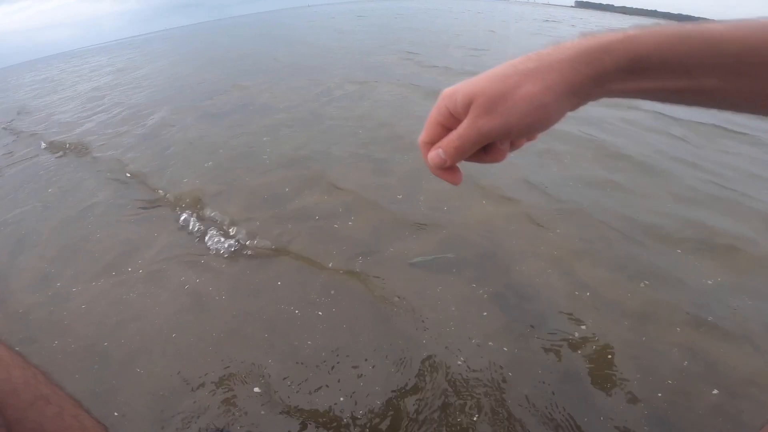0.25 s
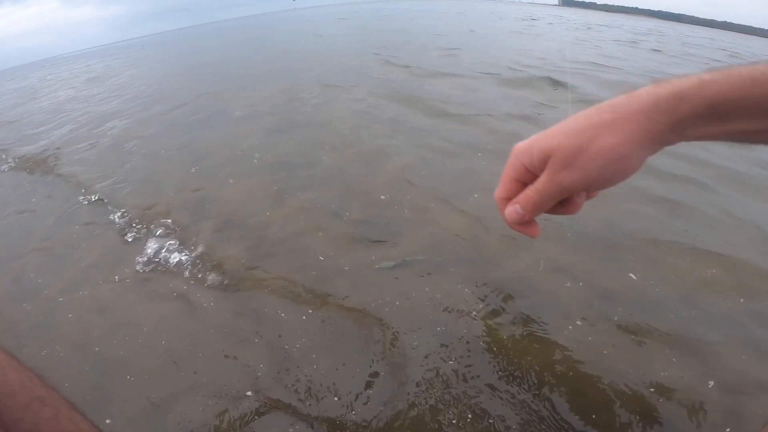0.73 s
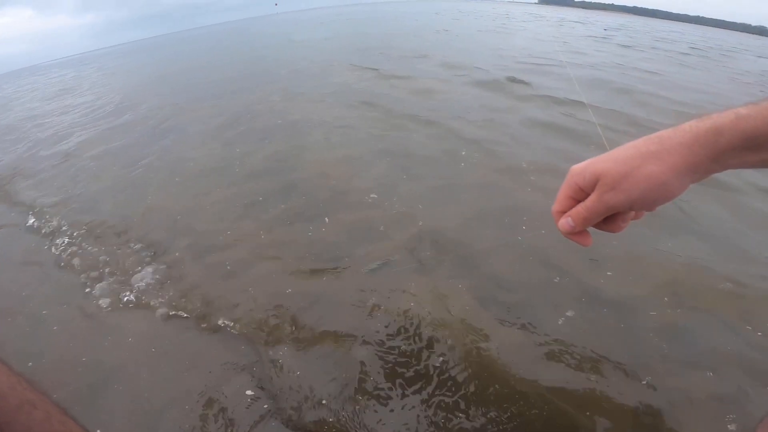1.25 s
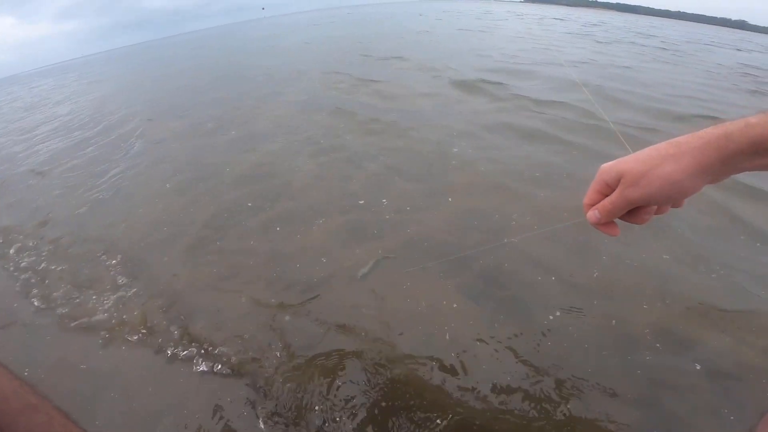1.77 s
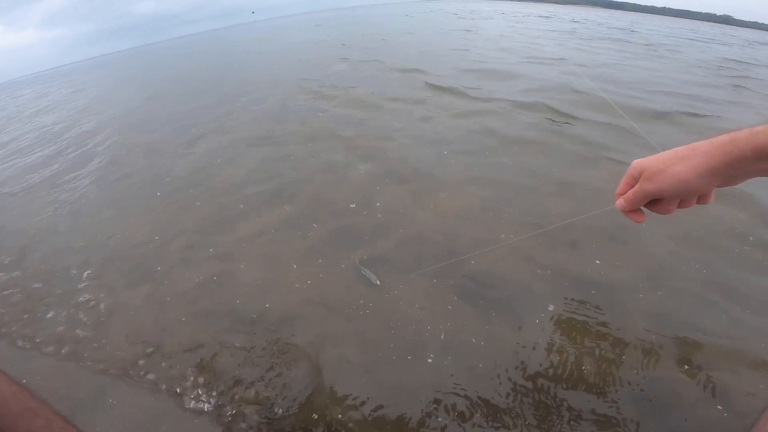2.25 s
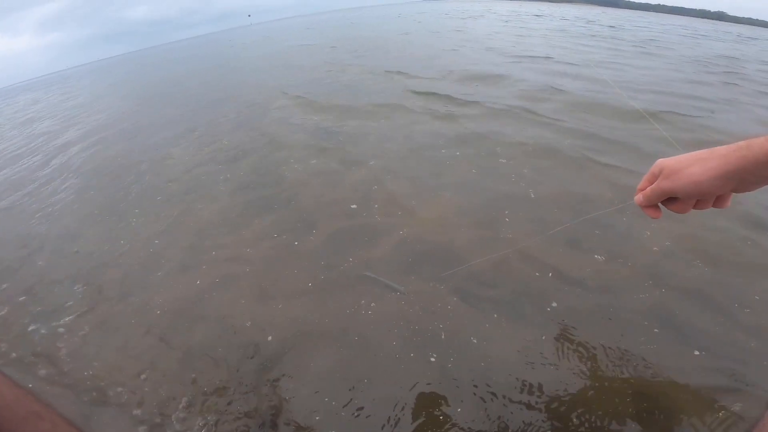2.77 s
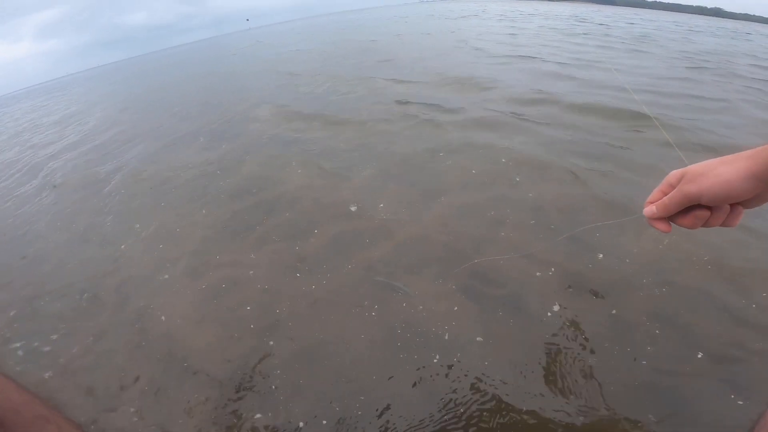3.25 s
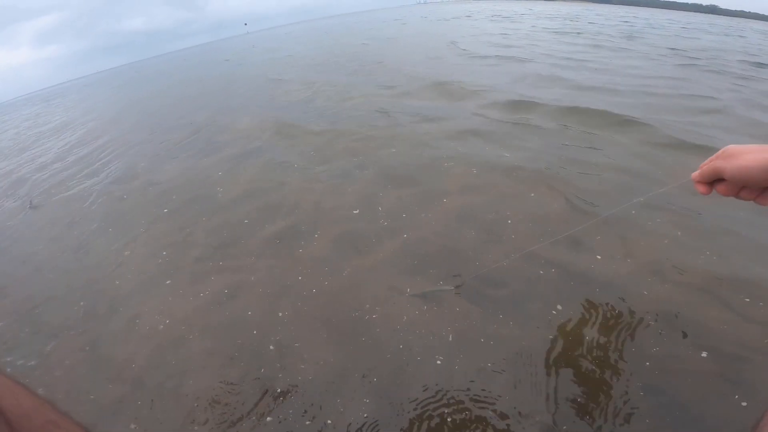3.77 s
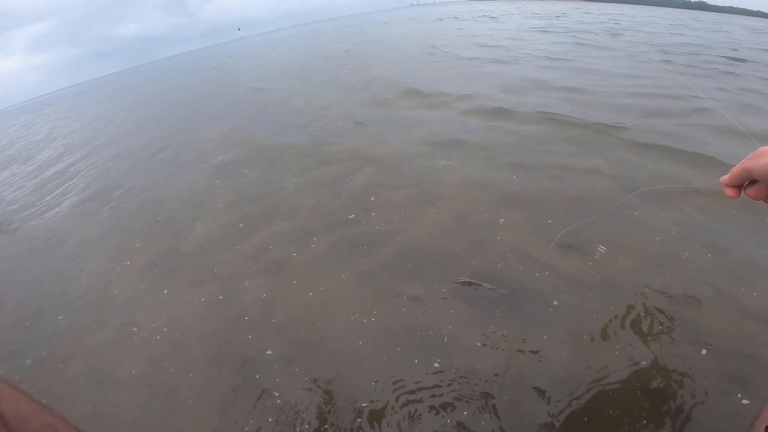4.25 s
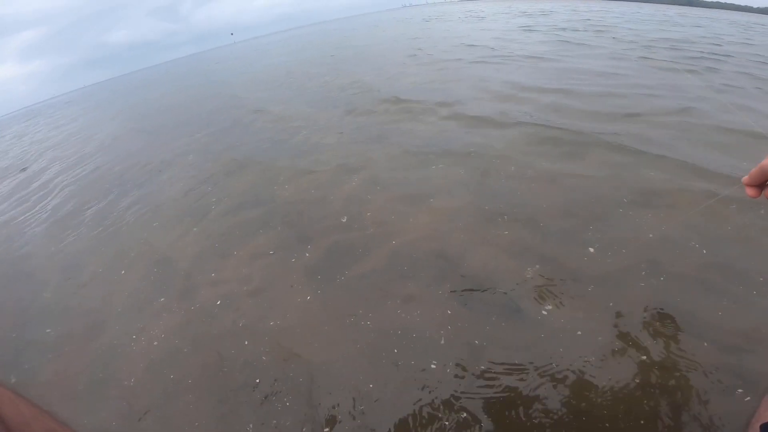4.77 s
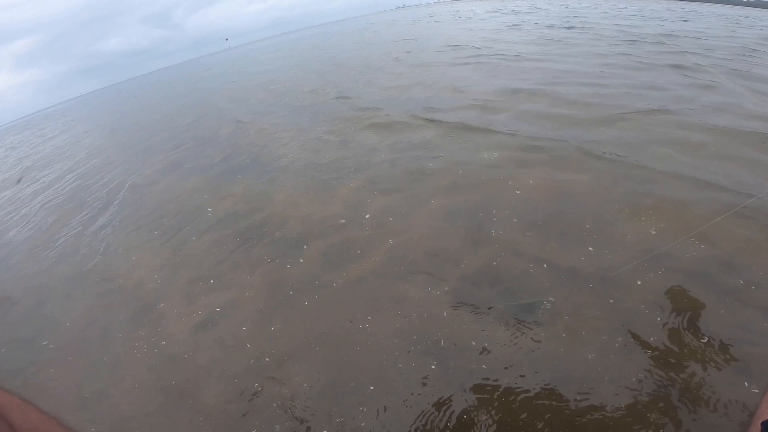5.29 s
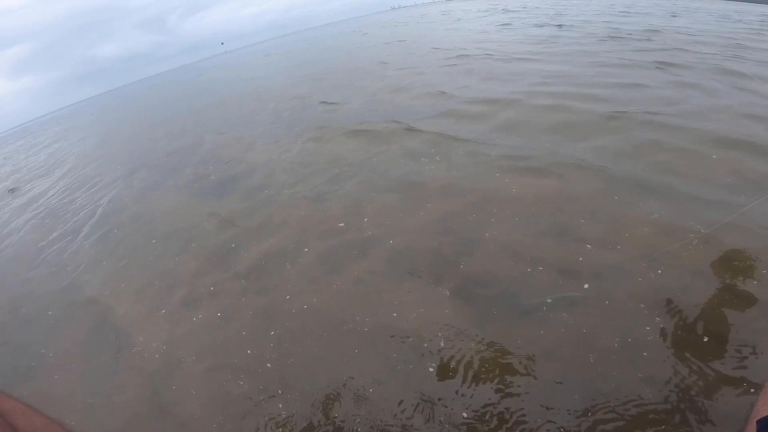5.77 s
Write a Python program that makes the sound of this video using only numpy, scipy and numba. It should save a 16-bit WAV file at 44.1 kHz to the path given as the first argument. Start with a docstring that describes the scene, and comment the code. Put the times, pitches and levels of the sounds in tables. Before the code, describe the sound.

Low wind buffets a close microphone while shallow open water laps and churns around a person's legs. A small splash comes early, followed by uneven bubbling and scattered drips. The loudest moment is a deep swirl with gurgles that climb in pitch, after which the water calms to a few plops under the wind. The whole sound is muffled and heavy, with very little treble.

```python
"""Legs wading through shallow water, close to a small camera microphone in the wind.
Trapped air rings as bubbles: countless small ones make the wash, single ones stand out of it, and two
pockets gurgle upwards as a leg pulls through. Droplets slap the surface; wind buffets the microphone.
The sound is deep and dull, as if slowed to quarter speed, with faint mirror images in the treble."""
import sys
import numpy as np
from scipy import signal
from scipy.io import wavfile
from scipy.ndimage import uniform_filter1d
from numba import njit

SR = 44100
rng = np.random.default_rng(int(sys.argv[2]) if len(sys.argv) > 2 else 0)


def wrap_up_sound(samples):
    """Save the sound to the file named by the first command line argument, as 16-bit audio."""
    columns = np.atleast_2d(samples).T
    # keep every value between -1 and 1, then stretch to whole-number steps
    tamed = np.clip(columns, -1, 1)
    steps = np.round(tamed * 32767).astype(np.int16)
    wavfile.write(sys.argv[1], SR, steps)


N = 265923

# spectral shape of the wind's rush: frequency_hz, relative_density_db
RUSH_SPECTRUM = [(35, -29), (60, 0), (141, -18), (572, -39.5), (747, -31.5), (812, -33), (913, -42),
                 (1940, -41), (3250, -70.5), (4220, -92), (7150, -120)]
# slow buffeting of the microphone port: time_s, level_db
BUFFETING = [(0, -30), (.15, -30.5), (1.1, -33), (1.3, -28), (1.7, -30.5), (2.15, -25.5), (2.4, -33),
             (2.8, -27.5), (3.5, -31.5), (3.7, -28), (4.3, -29), (4.7, -31), (5.3, -29.5), (5.49, -23.5),
             (5.7, -35), (6.03, -31.5)]
# gusts that thud on the port: centre_s, peak_db, half_width_s
PORT_GUSTS = [(0.037, -38, 0.2), (1.3, -47, 0.15), (2.25, -44, 0.18), (2.928, -29.5, 0.078),
              (3.108, -41, 0.088), (3.702, -36, 0.087), (4.521, -32.5, .07), (5.42, -34.5, 0.024),
              (5.898, -44.5, 0.087)]
# spectral shape within each crowd of bubbles: frequency_hz, relative_density_db
WASH_SPECTRUM = [(47, -32), (80, -6.5), (185, -4.5), (216, -6), (285, -9), (383, -14), (461, -14.5),
                 (679, -19.5), (898, -22), (1100, -29.5), (1980, -36.5), (2870, -50), (3250, -48.5),
                 (4220, -78), (7150, -120)]
# churning at the surface: time_s, burble_db, fizz_db
SURFACE_CHURN = [(0.05, -72, -83), (0.43, -67, -86), (0.64, -57, -76.5), (0.72, -51, -75), (0.8, -57, -76),
                 (1.03, -57.5, -71), (1.25, -53, -70.5), (1.33, -61.5, -79), (1.44, -53, -71),
                 (1.62, -62, -80), (1.9, -61, -74), (2.02, -66.5, -83.5), (2.2, -59.5, -74),
                 (2.54, -57, -75.5), (2.6, -62.5, -80), (2.76, -58.5, -73), (2.86, -67.5, -90),
                 (3.05, -60, -71.5), (3.25, -56.5, -74.5), (3.5, -59, -78), (3.6, -53.5, -69.5),
                 (3.82, -60.5, -73.5), (3.97, -53, -67.5), (4.19, -60.5, -75), (4.33, -57.5, -74),
                 (4.45, -64, -76.5), (4.71, -70, -83.5), (5.4, -70, -85.5), (5.95, -73.5, -84.5)]
# deep swirl dragged by the legs: time_s, level_db
LEG_SWIRL = [(0.0, -56), (0.18, -54), (1.04, -41), (2.08, -43.5), (2.62, -48.5), (3.44, -40), (3.83, -34),
             (4.06, -32.5), (4.67, -48.5), (6.03, -56)]
# droplets hitting the surface: start_s, relative_db, centre_hz, spread_octaves
DROPLETS = [(.7115, -26.5, 1296, 0.93), (1.14, -53.5, 3100, .4), (1.37, -41, 2240, 1),
            (1.435, -51, 2380, 1.05), (1.9435, -48.5, 2220, 1.37), (2.15, -51, 2600, 0.55),
            (2.335, -47, 1740, 1.95), (2.4344, -54, 2800, 1.04), (2.4784, -42.5, 1830, 0.48),
            (2.652, -59, 1880, 1.1), (3.02, -50, 3200, 0.26), (3.0738, -50, 2200, 1.8),
            (3.131, -45, 2250, 1.3), (3.5888, -45.5, 2200, 1.8), (3.6315, -28, 460, 1.6),
            (3.8934, -42, 1890, 1.3), (4.889, -41.5, 593, 2.1), (5.165, -44.5, 753, 1.65)]
# clear single bubbles: start_s, pitch_hz, relative_db, nominal_length_ms
CLEAR_BUBBLES = [(0.353, 733, -51.5, 9.5), (0.439, 932, -46.5, 14), (0.481, 552, -43.5, 31),
                 (0.548, 333, -41, 40), (0.579, 93, -35, 50), (0.597, 411, -40, 31),
                 (0.641, 301, -28.5, 36), (0.653, 1285, -45.5, 16), (0.711, 1635, -31.5, 6.4),
                 (0.71, 1143, -32.5, 13), (0.759, 1170, -45.5, 16), (0.785, 1910, -49.5, 8),
                 (0.841, 789, -40.5, 36), (0.921, 1397, -46.5, 10.5), (1.006, 680, -43, 13),
                 (1.053, 1590, -49, 19), (1.061, 162.3, -26, 46), (1.087, 488, -29, 21.3),
                 (1.11, 176.4, -29, 40), (1.139, 917, -44.5, 16), (1.186, 576, -37, 26.7),
                 (1.208, 1336, -48, 23), (1.237, 922, -33.5, 11), (1.252, 318, -34.5, 29),
                 (1.258, 774, -38, 30), (1.372, 2030, -54, 14), (1.426, 1455, -51, 16),
                 (1.446, 1610, -50, 22), (1.504, 567, -39.5, 27), (1.511, 425, -38.5, 30),
                 (1.523, 285, -34.5, 54), (1.538, 885, -42.5, 11), (1.942, 1856, -51.5, 10.3),
                 (2.061, 582, -37.5, 13.8), (2.17, 1960, -50, 12.4), (2.227, 890, -39.5, 14),
                 (2.336, 1560, -48, 15.4), (2.421, 154.4, -36.5, 70), (2.431, 479, -37, 18),
                 (2.443, 590, -37.5, 10.7), (2.479, 970, -45, 16), (2.487, 509, -41.5, 24),
                 (2.532, 2190, -53.5, 9.9), (2.542, 567, -42.5, 21), (2.653, 676, -43, 17),
                 (2.7, 309, -36, 29), (2.715, 404, -35, 23), (2.741, 270, -31, 36),
                 (2.756, 597, -36.5, 13.4), (2.786, 525, -41, 42), (2.951, 109, -32.5, 26),
                 (3.07, 1468, -49, 13), (3.128, 1780, -46.5, 6.1), (3.198, 945, -49, 43),
                 (3.25, 923, -44.5, 24), (3.374, 554, -40, 27), (3.404, 958, -42, 17),
                 (3.629, 277, -31, 22), (3.63, 119.5, -18.5, 39), (3.68, 146.6, -29.5, 60),
                 (3.881, 569, -39.5, 39), (3.886, 1180, -46, 19), (3.924, 609, -35.5, 28),
                 (3.964, 884, -45.5, 19), (4.03, 892, -31, 23), (4.058, 478, -25, 21.6),
                 (4.07, 197.7, -20.5, 33), (4.15, 162.6, -20.5, 26), (4.189, 184, -17.5, 25.5),
                 (4.294, 1230, -49, 11), (4.408, 583, -39, 29), (4.42, 234, -31.5, 55),
                 (4.624, 2117, -60, 8.8), (4.888, 627, -39.5, 12.3), (5.019, 490, -44.5, 42),
                 (5.169, 750, -49.5, 16), (5.543, 442, -48, 26), (5.729, 720, -45.5, 17),
                 (5.985, 727, -51, 7.7)]
# two air pockets behind the leg, a list of rows for each: time_s, pitch_hz, relative_db
AIR_POCKETS = [
    [(3.665, 129.2, -23.5), (3.705, 149.6, -30), (3.771, 234.8, -31), (3.849, 285.5, -38.5),
     (3.92, 305, -43.5)],
    [(3.7, 85.4, -49), (3.718, 85.8, -23.5), (3.824, 89.2, -37.5), (3.98, 111.5, -27), (4.04, 146.3, -33),
     (4.13, 172.8, -34), (4.296, 178.2, -33.5), (4.36, 239.5, -40), (4.456, 237, -34.5), (4.55, 226, -46)],
]

RUSH_DB, THUD_CALM_DB = -60, -45
CHURN_MID_DB, SWIRL_MID_DB, FIZZ_MID_DB = -60, -44, -77  # middling water movement
GURGLE_DB, GURGLE_PER_CHURN, GURGLE_PER_SWIRL = -48.5, 0.44, 0.61  # middling level; slopes in dB per dB
FOAM_DB, FOAM_PER_FIZZ = -80.5, 1.6  # middling level; slope in dB per dB
DULL_TOP_HZ, OUTPUT_TOP_HZ = 4200, 14450


def undb(db):
    """Decibels to gain."""
    return 10 ** (np.asarray(db) / 20)


def unit(x):
    """Scale to rms 1."""
    return x / np.sqrt(np.mean(x ** 2))


def curves(table):
    """The columns after a table's time column, as values for every sample."""
    time_s, *columns = np.transpose(table)
    return [np.interp(np.arange(N) / SR, time_s, column) for column in columns]


def spectrum_db(table, hz):
    """Read a spectrum on a log-frequency axis."""
    frequency_hz, db = np.transpose(table)
    return np.interp(np.log(hz), np.log(frequency_hz), db)


def band_noise(lo_hz, hi_hz):
    """Band-passed noise of rms 1."""
    bandpass = signal.butter(2, [lo_hz, hi_hz], "bandpass", fs=SR, output="sos")
    return unit(signal.sosfilt(bandpass, rng.standard_normal(N)))


def wander(rate_hz):
    """Random values held for 1 / rate_hz seconds and smoothed twice; rms 1."""
    hold = int(SR / rate_hz)
    steps = np.repeat(rng.standard_normal(N // hold + 1), hold)
    return unit(uniform_filter1d(uniform_filter1d(steps, hold), hold)[:N])


def wind():
    """Right at the microphone, eddies push the diaphragm and gusts thud; a weak rush flickers by band."""
    t = np.arange(N) / SR
    buffet = undb(curves(BUFFETING)[0]) * band_noise(5.07, 23)
    gusts = sum(undb(db) * np.exp(-((t - centre_s) / half_s) ** 2) for centre_s, db, half_s in PORT_GUSTS)
    thud = (undb(THUD_CALM_DB) + gusts) * band_noise(33, 72)
    rush = 0
    for hz in 90 * 2 ** np.arange(0, 5.4, .5):  # half-octave bands
        band_db = spectrum_db(RUSH_SPECTRUM, hz) + 10 * np.log10(hz) + 8.3 * wander(11)
        rush = rush + undb(band_db) * band_noise(hz / 1.19, hz * 1.19)
    return buffet + thud + undb(RUSH_DB) * unit(rush)


@njit
def ring(start_s, hz, length_s, gain, glide, rise):
    """Ringing air: sines that swell over the share `rise` of their length and fade as the pitch glides."""
    out = np.zeros(N)
    for k in range(len(start_s)):
        phase, first, length = 0., int(start_s[k] * SR), length_s[k] * SR
        for j in range(min(int(4 * length), N - first)):
            age = j / length
            phase += 2 * np.pi * hz[k] / SR * (1 + glide * (age - .5))
            envelope = (1 - np.exp(-age / rise)) * np.exp(-age * age)
            out[first + j] += gain[k] * envelope * np.sin(phase)
    return out


def swarm(count, lo_hz, hi_hz, cycles, spread_db, patchy_db):
    """A random crowd of bubbles between two pitches, a few much louder than the rest; rms 1."""
    when, pitch, strength, duration = rng.random((count, 4)).T
    hz = lo_hz * (hi_hz / lo_hz) ** pitch
    # neighbours in time and size belong to one cluster and share its strength
    clusters = np.array([wander(24.924) for _ in range(3)])
    cluster_db = patchy_db * clusters[(3 * pitch).astype(int), (when * N).astype(int)]
    colour_db = spectrum_db(WASH_SPECTRUM, hz) + 20 * np.log10(hz)
    gain = undb(colour_db - spread_db * np.log(1 - strength) + cluster_db)
    length_s = cycles * (0.4 + 1.62 * duration ** 2) / hz
    return unit(ring(when * N / SR, hz, length_s, gain, glide=.04, rise=.15))


def wash():
    """Round the legs, four size classes of bubbles follow the churn and swirl; bursting foam crackles."""
    burble_db, fizz_db = curves(SURFACE_CHURN)
    swirl_db = curves(LEG_SWIRL)[0]
    swirl = swarm(count=1500, lo_hz=86.8, hi_hz=298.9, cycles=4.7, spread_db=2.07, patchy_db=1.25)
    gurgle = swarm(count=5000, lo_hz=300.8, hi_hz=1097, cycles=7.13, spread_db=1.4, patchy_db=2.64)
    burble = swarm(count=7000, lo_hz=1058.6, hi_hz=2388, cycles=11.5, spread_db=1.76, patchy_db=1.86)
    fizz = swarm(count=9000, lo_hz=2432, hi_hz=4320, cycles=21.0, spread_db=0.97, patchy_db=3.5)
    foam = swarm(count=260, lo_hz=2300, hi_hz=3900, cycles=4, spread_db=1.5, patchy_db=2.5)
    gurgle_db = (GURGLE_DB + GURGLE_PER_CHURN * (burble_db - CHURN_MID_DB)
                 + GURGLE_PER_SWIRL * (swirl_db - SWIRL_MID_DB))
    # foam only bursts where the water churns hard, so it swells faster than the fizz
    foam_db = FOAM_DB + FOAM_PER_FIZZ * (fizz_db - FIZZ_MID_DB)
    return (undb(swirl_db) * swirl + undb(gurgle_db) * gurgle + undb(burble_db) * burble
            + undb(fizz_db) * fizz + undb(foam_db) * foam)


def droplet_slaps():
    """Each droplet slaps the surface and sets off eight very short rings, spread round its centre pitch."""
    start_s, db, centre_hz, octaves = np.repeat(DROPLETS, 8, axis=0).T
    late, detune = rng.random((len(start_s), 2)).T
    slot = np.arange(len(start_s)) % 8
    hz = centre_hz * 2 ** (octaves * (slot + detune - 4) / 8)
    return ring(start_s + 0.0062 * late, hz, 4.5 / hz, undb(db - 5), glide=0., rise=.47)


def clear_bubbles():
    """Single bubbles ring out in front of the wash; each sheds two weaker ones of nearly its size."""
    start_s, hz, db, nominal_ms = np.transpose(CLEAR_BUBBLES)
    length_s = .75 * np.clip(nominal_ms, 2, 200) / 1000
    out = ring(start_s, hz, length_s, undb(db + 5), glide=.03, rise=.37)
    shed_db = db - 13.5 + 4.5 * np.log2(hz / 300)  # small bubbles come in sprays, large ones nearly alone
    chance = rng.standard_normal((len(hz), 4)).T
    for late, detune in (chance[:2], chance[2:]):
        shed_s = np.clip(start_s + length_s * (0.4106 + .8 * late), 0, (N - 1) / SR)
        shed_hz = hz * (1 + 0.078 * detune)
        out += ring(shed_s, shed_hz, 2 * length_s, undb(shed_db), glide=.05, rise=.21)
    return out


def air_pocket(path):
    """Air behind the leg: a wavering tone that rises as it shrinks and throbs as water closes its mouth."""
    hz, db = curves(path)
    t = np.arange(N) / SR
    start_s, end_s = path[0][0], path[-1][0]
    gate = uniform_filter1d(1. * (t > start_s) * (t < end_s), size=400)
    wavering_hz = hz * (1 + .025 * wander(55))
    tone = np.sin(2 * np.pi * np.cumsum(wavering_hz) / SR)
    throb_db = 1.1 * wander(45)
    return gate * undb(db + 0.9 + throb_db) * tone


def scene():
    """Wading in the shallows and wind, picked up by one microphone."""
    water = wash() + clear_bubbles() + sum(air_pocket(path) for path in AIR_POCKETS) + droplet_slaps()
    return (water + wind())[None]


def record(dry):
    """A dull top with faint mirror images in the treble, as if slowed to quarter speed."""
    dull = signal.sosfilt(signal.butter(7, DULL_TOP_HZ, fs=SR, output="sos"), dry[0])
    kept = np.arange(0, N, 4)
    joined = np.interp(np.arange(N), kept, dull[kept])  # the straight joins make the mirror images
    treble_cut = signal.ellip(8, .2, 70, OUTPUT_TOP_HZ, fs=SR, output="sos")
    return signal.sosfilt(treble_cut, joined)[None]


dry = scene()
out = record(dry)
wrap_up_sound(out)
```